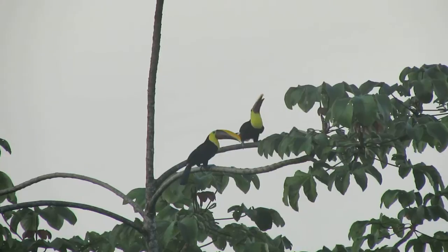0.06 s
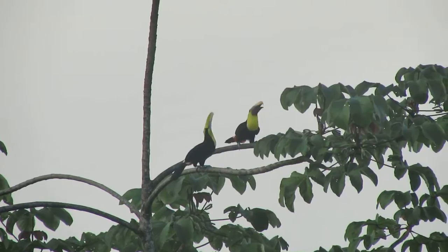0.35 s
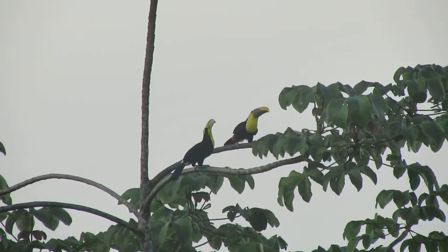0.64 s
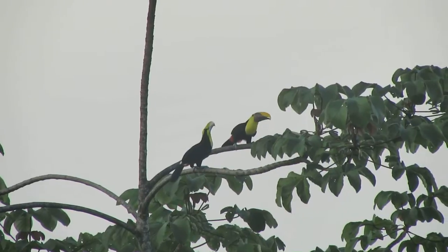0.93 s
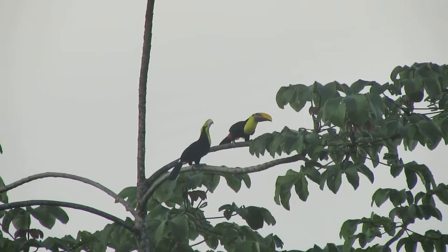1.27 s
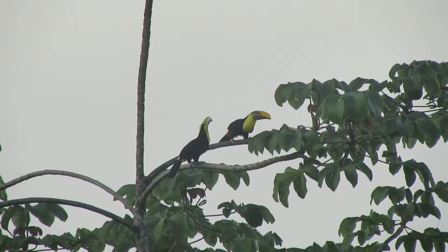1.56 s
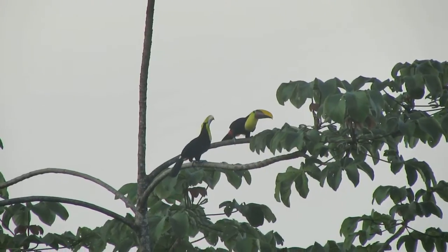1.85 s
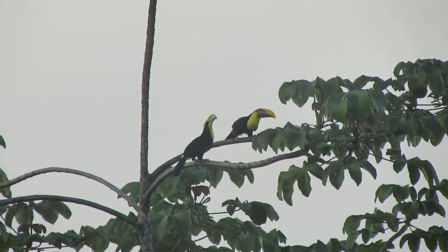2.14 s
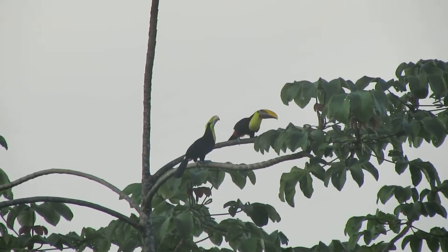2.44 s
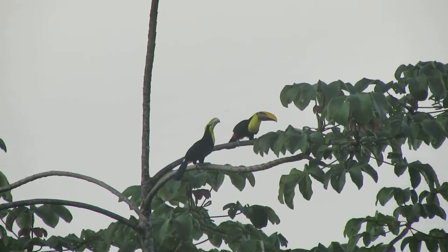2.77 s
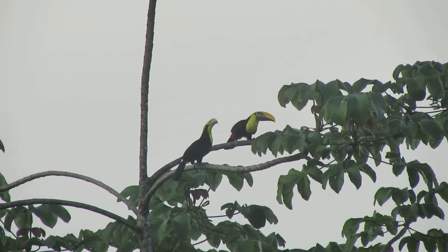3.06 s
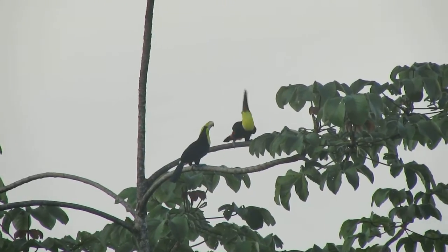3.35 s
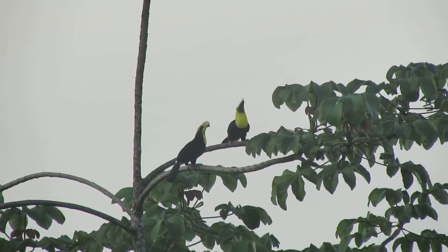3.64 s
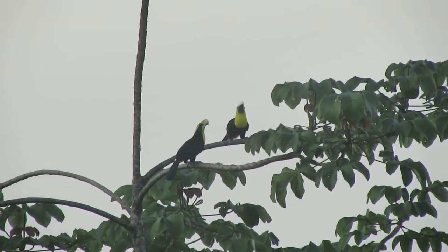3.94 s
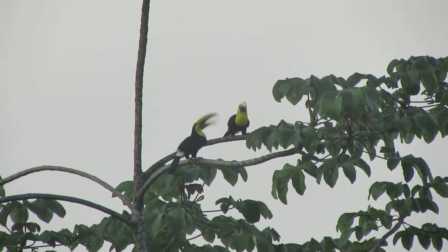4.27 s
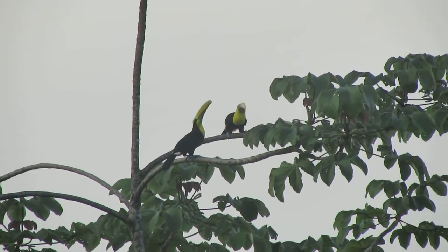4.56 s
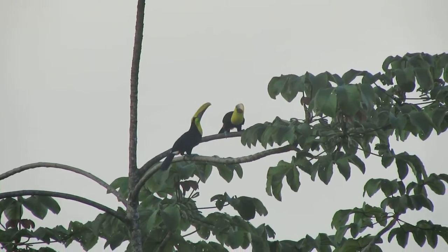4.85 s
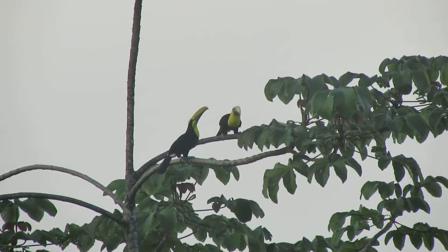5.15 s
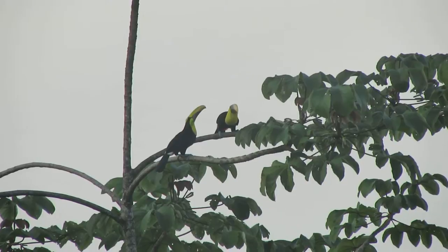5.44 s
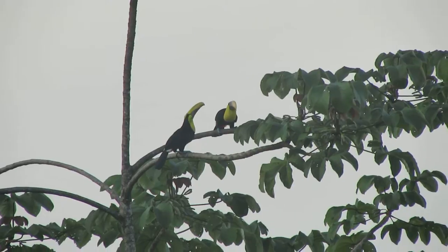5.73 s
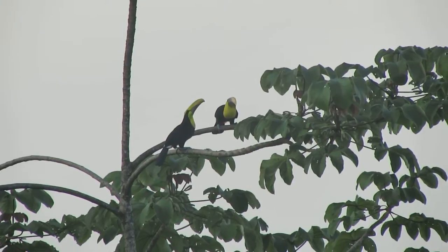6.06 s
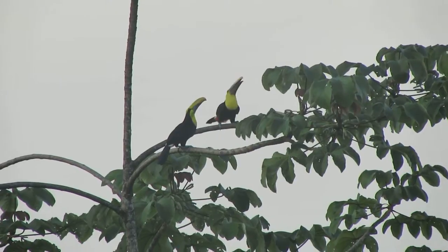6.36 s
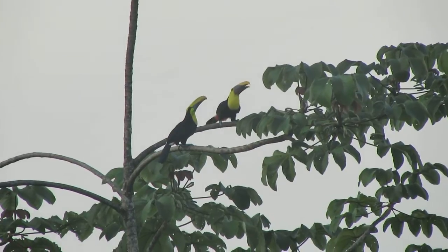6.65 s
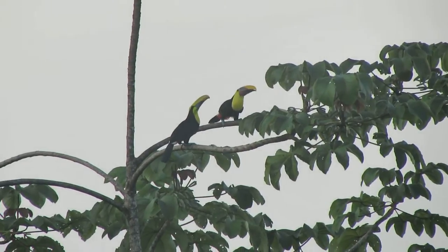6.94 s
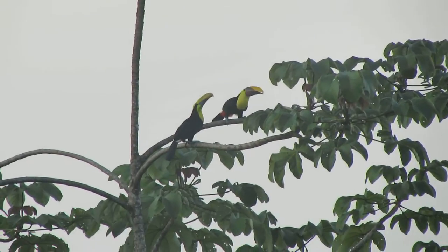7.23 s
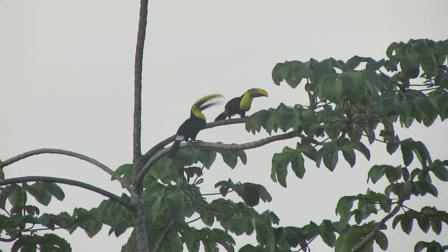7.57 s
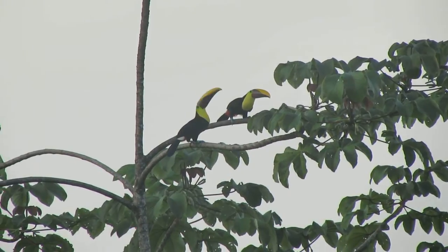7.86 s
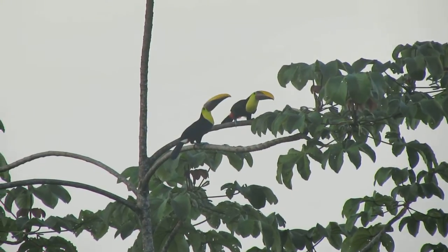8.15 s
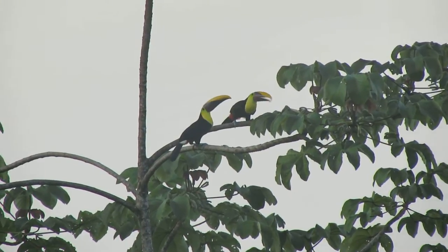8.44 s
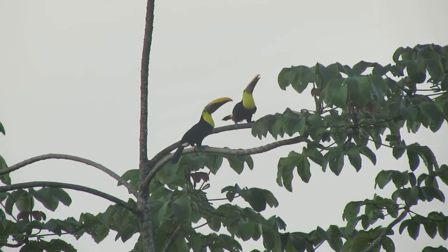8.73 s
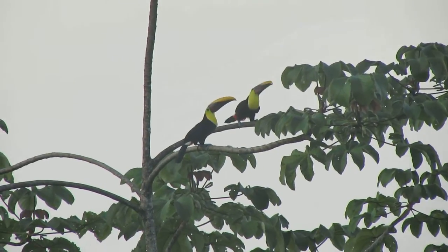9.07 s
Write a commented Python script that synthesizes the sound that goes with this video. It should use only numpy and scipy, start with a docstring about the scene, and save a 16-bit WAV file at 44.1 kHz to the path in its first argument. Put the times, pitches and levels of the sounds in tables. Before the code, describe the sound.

Two toucans yelp and yip loudly in a rainforest treetop, over insect buzz, distant small birds and a low rumble.

```python
"""A low rumble, a distant rush, canopy hiss and narrow bands of insect buzz sound from the start,
and small birds call far off. Almost at once two toucans begin in a treetop: the syrinx gives long
falling yelps, then short arched yips, and the rainforest scatters them into echoes. Scratchy squeaks,
coloured by the beak's resonance, fall among the calls. Fresh phrases open near 3.5 s and 6.3 s;
leaves brush twice around the latter, and the pair calls once more near the end."""
import sys
import numpy as np
from scipy import signal
from scipy.fft import rfft, irfft, next_fast_len
from scipy.io import wavfile
from scipy.ndimage import map_coordinates

SR = 44100
rng = np.random.default_rng(int(sys.argv[2]) if len(sys.argv) > 2 else 0)


def generate_wav(signal):
    """Clip the signal to [-1, 1] and save it as 16-bit WAV at the path in sys.argv[1]."""
    frames = np.transpose(np.atleast_2d(signal))
    scaled = np.clip(frames, -1, 1) * 32767
    pcm = np.round(scaled).astype(np.int16)
    wavfile.write(sys.argv[1], SR, pcm)


N = 410130

RELAXED_HZ, STRAINED_HZ = 1450, 1730  # a toucan's pitch with a slack and a tight membrane
FRAY = 0.028  # random pitch scatter as the pressure drops, as a share of the pitch


def amp(db):
    """Decibels to amplitude ratio."""
    return 10 ** (np.asarray(db) / 20)


def unit(x):
    """Normalisation to rms 1."""
    return x / np.sqrt(np.mean(x ** 2) + 1e-20)


def along(points, hz):
    """Interpolation of (frequency, value) points on a logarithmic frequency axis."""
    freqs, values = np.transpose(points)
    return np.interp(np.log(hz + 1), np.log(freqs + 1), values)


def wobble(rate, size=N):
    """Smooth random modulation: a spline through rate knots a second."""
    knots = rng.standard_normal(size // 20 + 8)
    return map_coordinates(knots, [np.arange(size) * rate / SR], mode="wrap")


def filtered(x, response):
    """Linear filtering: the spectrum is multiplied by a frequency response."""
    size = next_fast_len(N + SR // 2)
    return irfft(rfft(x, size) * response(np.fft.rfftfreq(size, 1 / SR)), size)[..., :N]


def noise(response, correlation):
    """Coloured stereo noise of rms 1; the mid-side ratio sets the left-right correlation."""
    mid, side = filtered(rng.standard_normal((2, N)), response)
    angle = np.arccos(np.clip(correlation, -1, 1)) / 2
    return unit(np.cos(angle) * mid + np.sin(angle) * np.array([side, -side]))


def panned(pan_db):
    """Constant-power panning; pan_db is the left level minus the right."""
    return unit(amp([[pan_db / 2], [-pan_db / 2]]))


def add(track, start, sound):
    """Superposition of a sound on a track at a start time in seconds."""
    i = max(round(start * SR), 0)
    track[..., i:i + sound.shape[-1]] += sound[..., :max(N - i, 0)]


def rumble(base_db=-49, lumps_db=4.5):
    """Low noise, nearly in antiphase between the channels, modulated into lumps and swells."""
    # rumble spectrum: frequency_hz, density_db
    spectrum = [(12, -20.5), (28, -1), (55, -0.5), (85, -20), (140, -41), (400, -62)]
    # Gaussian rises in level: peak_s, half_width_s, rise_db
    swells = [(.1, 0.27, 12.5), (3.35, 0.44, 9), (6.4, 0.51, 5.5), (8.9, .35, 8.5)]
    t = np.arange(N) / SR
    swell_db = sum(rise_db * np.exp(-((t - peak) / width) ** 2) for peak, width, rise_db in swells)
    low = noise(lambda hz: amp(along(spectrum, hz)), correlation=-0.9)
    lumpy = unit(low * amp(lumps_db * wobble(9)))
    return amp(base_db + swell_db) * panned(3.2) * lumpy


def distant_rush(level_db=-47, drift_db=1.5):
    """A diffuse field: noise almost uncorrelated between the channels, drifting in level."""
    # rush spectrum: frequency_hz, density_db
    spectrum = [(41, -19), (70, -5), (113, -3), (204, -2), (256, -2), (292, -3.5), (425, -9.5),
                (527, -14.5), (757, -13.5), (1530, -22), (2020, -25), (2200, -34), (2860, -44),
                (4840, -120)]
    rush = noise(lambda hz: amp(along(spectrum, hz)), correlation=0.011)
    return amp(level_db + drift_db * wobble(6.2)) * panned(-1.2) * rush


def canopy_hiss(level_db=-57.0):
    """Stationary broadband noise: the fine hiss of the canopy."""
    # hiss spectrum: frequency_hz, density_db
    spectrum = [(1200, -4.5), (2000, 2.5), (2550, 3.5), (3500, 0), (5400, -3), (5900, 3), (7000, 0),
                (9500, -9), (10500, -10), (13000, -12.5), (15500, -15.5)]
    return amp(level_db) * noise(lambda hz: amp(along(spectrum, hz)), correlation=0.035)


def insects(throb=0.14, order=5, waver_db=0.8):
    """Amplitude modulation: each kind pulses its own narrow noise band at a slightly unsteady rate."""
    # the buzz of each kind: centre_hz, width_hz, pulse_hz, level_db
    kinds = {"drone": (6498, 619, 54.5, -57.5), "buzz": (7470.5, 561, 104, -68),
             "whine": (8536, 480, 211.5, -66.5), "sizzle": (8623, 897, 211, -68)}
    # when each kind sings: start_s, end_s
    bouts = {"drone": [(-1, 10)], "buzz": [(-1, 2.05), (2.7, 5.5), (6.35, 7.45), (8.05, 10)],
             "whine": [(-1, 2.8)], "sizzle": [(3.35, 10)]}
    fade_s = 0.2
    out, t = np.zeros((2, N)), np.arange(N) / SR
    for kind, (centre_hz, width_hz, pulse_hz, db) in kinds.items():
        band = noise(lambda hz: 1 / (1 + np.abs(2 * (hz - centre_hz) / width_hz) ** order), 0.046)
        rate_hz = pulse_hz * (1 + 0.083 * wobble(22))
        pulses = 1 + throb * np.sin(2 * np.pi * np.cumsum(rate_hz) / SR)
        singing = sum(np.clip(.5 + np.minimum(t - start, end - t) / fade_s, 0, 1)
                      for start, end in bouts[kind])
        out += amp(db + waver_db * wobble(2.3)) * singing * unit(band * pulses)
    return out


def songbirds():
    """Whistles, hoots and chips as gliding pure tones; random frequency modulation makes some rasp."""
    # small birds' calls: start_s, length_s, first_hz, last_hz, relative_db, rasp_share
    calls = [ (0, 0.021, 1330, 1283, -46.5, 0.0028), (0, 0.95, 711, 713, -63.5, 0.0041),
             (0.845, 0.17, 5400, 4530, -45.5, 0.016), (0.955, 0.17, 4720, 3400, -54, 0.035),
             (1.55, 0.5, 2540, 2472, -73, 0.024), (1.739, 0.027, 9800, 5460, -55, .02),
             (2.633, 0.01, 10000, 5320, -47, 0.017), (5.332, 0.071, 1980, 1874, -57, .004),
             (6.07, 0.043, 2450, 2530, -62.5, .01), (7.148, 0.092, 4120, 3850, -46, 0.076)]
    out = np.zeros(N)
    for start, length, first_hz, last_hz, db, rasp in calls:
        u = np.linspace(0, 1, int(length * SR))
        glide_hz = first_hz + (last_hz - first_hz) * u
        pitch = glide_hz * (1 + rasp * wobble(603, size=2 * SR)[:len(u)])
        tone = np.sin(2 * np.pi * np.cumsum(pitch) / SR)
        add(out, start, amp(db) * unit(np.sqrt(u * (1 - u)) * tone))
    return np.array([out, out])


def forest(x, near_db, far_db, near_t60=0.17, build_s=0.024):
    """Scattering: near trunks and leaves echo at once; deeper forest builds and dies, treble first."""
    # reflection by foliage: frequency_hz, gain_db
    reflection = [(1400, -6), (3000, 0), (5000, -2.5), (9000, -6.5)]
    # reverberation time of the deeper forest: frequency_hz, t60_s
    decay_times = [(1400, 1.11), (3000, 0.97), (5000, 1), (10000, 0.061)]
    hz, t, spectra = signal.stft(rng.standard_normal((2, 2, SR)), SR, nperseg=256)
    near, far = spectra * amp(along(reflection, hz))[:, None]
    near_decay = amp(-60 * t / near_t60) * (t > .002)
    far_decay = amp(-60 * t / along(decay_times, hz)[:, None]) * (1 - np.exp(-t / build_s))
    near = signal.istft(near * near_decay, SR, nperseg=256)[1]
    far = signal.istft(far * far_decay, SR, nperseg=256)[1]
    echoes = (amp(near_db) * unit(near) + amp(far_db) * unit(far)) / np.sqrt(far.shape[-1])
    return signal.fftconvolve(x.mean(axis=0)[None], echoes, axes=1)[:, :N]


def syrinx(pitch, bright_db, fundamental_db, jitter=0.0034, shimmer_db=0.66, flutter_db=3.0):
    """A vibrating membrane gives a harmonic series; more tension makes it higher and brighter."""
    # the toucan's harmonics, from the first up: relaxed_db, strained_db, pan_db
    harmonics = [(-8, -14, 1), (-1, 0.5, -4.5), (-16, -11, 6.5), (-28, -14, -2), (-26, -23, 3),
                 (-39, -32.5, 3.5), (-53, -38, -4), (-58, -44, 4), (-69, -65, -9)]
    attack_s, release_s = 0.004, 0.0021
    throat_hz = 1422  # the throat radiates little below this
    t = np.arange(len(pitch)) / SR
    waver = lambda rate: wobble(rate, size=SR // 2)[:len(t)]
    phase = 2 * np.pi * np.cumsum(pitch * (1 + jitter * waver(456))) / SR
    strain = np.clip((pitch - RELAXED_HZ) / (STRAINED_HZ - RELAXED_HZ), 0, 1)
    throat_db = -10 * np.log10(1 + (throat_hz / pitch) ** 28)
    note = np.zeros((2, len(t)))
    for k, (relaxed_db, strained_db, pan_db) in enumerate(harmonics, 1):
        source_db = relaxed_db + (strained_db - relaxed_db) * strain
        if k == 1:
            colour_db = fundamental_db + throat_db
        else:
            colour_db = bright_db * np.log2(k / 2) + flutter_db * waver(77.0)
        note += panned(pan_db) * amp(source_db + colour_db) * np.sin(k * phase)
    gate = np.clip(t / attack_s, 0, 1) * np.clip((t[-1] - t) / release_s, 0, 1)
    return note * gate * amp(shimmer_db * waver(240))


def yelp(length, crest_hz, end_hz, opening_db, slurred, fade_db=-1.0, collapse_db=-10):
    """Pitch glides from crest to sagging shelf, then, unless slurred, collapses with the pressure."""
    glide_s, scoop_s, let_go_s = 0.0096, 0.007, 0.00786
    scoop, droop = 0.02, 0.201  # shares of the pitch lost at onset and in the collapse
    t = np.arange(int(length * SR)) / SR
    fall_s = 0.044 * (crest_hz / STRAINED_HZ) ** 3.84  # higher notes are held longer
    shelf_hz = 0.847 * crest_hz
    high = 1 / (1 + np.exp((t - fall_s) / glide_s))
    sag = np.clip((t - fall_s) / (length - fall_s), 0, 1) ** 2
    collapse = 0 if slurred else np.exp((t - length) / let_go_s)
    fray = FRAY * np.sqrt(collapse) * wobble(683, size=SR // 2)[:len(t)]
    pitch = high * crest_hz + (1 - high) * (shelf_hz + (end_hz - shelf_hz) * sag)
    pitch *= 1 - scoop * np.exp(-t / scoop_s) - droop * collapse + fray
    return pitch, amp(opening_db * high + fade_db * sag + collapse_db * collapse)


def yip(length, crest_hz, arch=0.131, hook=0.118, foot_db=-9, push_db=3):
    """One pressure pulse: pitch rides an arch that frays at its feet; level peaks after the crest."""
    entry = -0.78 * min(length / 0.065, 1) ** 2  # yips under 65 ms start nearer the crest, at u = 0
    u = np.linspace(entry, 1, int(length * SR))
    slack = arch * u ** 2 + hook * np.abs(u) ** 5
    fray = FRAY * u ** 2 * wobble(681, size=SR // 2)[:len(u)]
    return crest_hz * (1 - slack + fray), amp(foot_db * slack / (arch + hook) + push_db * u)


def toucans(yelp_fundamental_db=7.5, yip_fundamental_db=3.5, slur_s=0.025):
    """Phonation: pitch and level contours drive each syrinx; yelps have the fuller fundamental."""
    # long falling notes: start_s, length_s, crest_hz, end_hz, level_db, bird
    yelps = [ (0.052, 0.16, 1732, 1353, -25, "lead"), (0.356, 0.074, 1726, 1330, -31.5, "lead"),
             (3.515, .21, 1755, 1440, -24.5, "lead"), (4.072, 0.14, 1651, 1300, -34, "mate"),
             (4.5, .12, 1720, 1320, -29.5, "lead"), (6.326, 0.18, 1749, 1421, -23.5, "lead"),
             (6.555, .137, 1605, 1366, -32, "mate"), (7.808, 0.048, 1610, 1300, -29, "lead"),
             (8.569, .13, 1627, 1368, -33.5, "mate"), (8.71, .17, 1728, 1446, -24.5, "lead")]
    # short arched notes: start_s, length_s, crest_hz, level_db, tilt_db_per_octave, bird
    yips = [ (0.284, 0.045, 1603, -27, -2, "lead"), (0.326, 0.024, 1408, -30.5, 4.5, "mate"),
            (0.454, 0.012, 1668, -32, -5, "mate"), (.575, .038, 1591, -31.5, 4, "lead"),
            (0.703, 0.03, 1538, -29.5, 2, "lead"), (1.115, 0.018, 1479, -32.5, -1, "lead"),
            (1.225, 0.02, 1454, -34.5, -1, "lead"), (2.337, 0.042, 1490, -40.5, 7.5, "mate"),
            (3.718, 0.073, 1625, -25, 3, "lead"), (4.156, 0.041, 1580, -31, 3, "lead"),
            (4.295, .021, 1506, -26.5, -0.5, "lead"), (4.377, 0.011, 1692, -33.5, -15, "lead"),
            (4.687, 0.047, 1567, -30, -3.5, "lead"), (4.815, 0.029, 1531, -30, -3.5, "lead"),
            (4.966, 0.017, 1360, -39, 4, "mate"), (6.539, .066, 1623, -24.5, -3.5, "lead"),
            (6.785, .018, 1452, -30, 0, "mate"), (6.861, 0.032, 1575, -29, 0.5, "lead"),
            (6.986, 0.0246, 1549, -30.5, 1.5, "lead"), (7.078, 0.0204, 1376, -46, -1, "mate"),
            (7.166, 0.016, 1400, -33.5, 1, "mate"), (7.395, 0.011, 1458, -32.5, 2, "lead"),
            (7.51, 0.0095, 1468, -31.5, 2, "lead"), (8.8, 0.019, 1423, -33, -2, "mate"),
            (8.94, 0.041, 1573, -26, -3.5, "lead"), (9.074, 0.023, 1464, -34.5, 1, "mate"),
            (9.199, 0.014, 1387, -37, 7, "mate"), (9.247, 0.032, 1564, -28, -1.5, "lead")]
    # the lead and, further right, its mate: pan_db, yelp_tilt_db_per_octave, yelp_opening_db
    birds = {"lead": (-1.6, -7.5, -6), "mate": (-13.5, -2.1, 0)}
    out = np.zeros((2, N))
    for start, length, crest_hz, end_hz, db, bird in yelps:
        pan_db, bright_db, opening_db = birds[bird]
        # a yelp is slurred when a yip begins just before it ends
        slurred = any(0 < start + length - yip_start < slur_s for yip_start, *_ in yips)
        pitch, swell = yelp(length, crest_hz, end_hz, opening_db, slurred)
        note = syrinx(pitch, bright_db, yelp_fundamental_db)
        add(out, start, amp(db) * panned(pan_db) * swell * note)
    for start, length, crest_hz, db, bright_db, bird in yips:
        pitch, swell = yip(length, crest_hz)
        note = syrinx(pitch, bright_db, yip_fundamental_db)
        add(out, start, amp(db) * panned(birds[bird][0]) * swell * note)
    return out


def squeaks(depth=0.38, lean=.75, jitter=0.0093, snap_db=9, pan_db=-4, harmonics=5):
    """Source and filter: pitch snaps up and falls, sweeping harmonics through the beak's resonance."""
    # scratchy notes: start_s, length_s, crest_hz, level_db
    notes = [(0.783, 0.043, 1648, -39.5), (2.79, 0.037, 1657, -39), (3.501, 0.051, 1852, -35.5),
             (5.471, 0.033, 1600, -37.5), (7.473, .04, 1668, -39.5), (9.026, 0.036, 1712, -34.5)]
    # response of the beak: frequency_hz, gain_db
    beak = [(1200, -11.5), (1650, -9.5), (2300, -3.5), (2800, -6), (3250, 3), (4000, -4), (4900, -10.5),
            (6000, -20), (9000, -39)]
    out = np.zeros((2, N))
    for start, length, crest_hz, db in notes:
        u = np.linspace(0, 1, int(length * SR))
        arch = np.abs(np.sin(np.pi * u ** lean))
        scratch = 1 + jitter * wobble(900, size=SR // 2)[:len(u)]
        pitch = crest_hz * (1 - depth * (1 - arch)) * scratch
        phase = 2 * np.pi * np.cumsum(pitch) / SR
        edge_db = snap_db * (.5 - 2 * u)  # the upper harmonics are strong only on the way up
        note = sum(amp(along(beak, k * pitch) + edge_db * (k > 2)) * np.sin(k * phase)
                   for k in range(1, harmonics + 1))
        add(out, start, amp(db) * panned(pan_db) * np.sqrt(arch) * note)
    return out


def rustles(grain_db=3):
    """Friction noise of brushing leaves; fast random modulation makes each swish grainy."""
    # swishes: start_s, length_s, level_db
    swishes = [(6.175, 0.06, -54.5), (7.12, 0.15, -51)]
    # leaf spectrum: frequency_hz, density_db
    spectrum = [(1500, -14), (4000, -3), (6000, -2.5), (10000, -18), (15500, -20)]
    swell = np.zeros(N)
    for start, length, db in swishes:
        add(swell, start, amp(db) * np.hanning(int(length * SR)))
    friction = noise(lambda hz: amp(along(spectrum, hz)), correlation=.4)
    return swell * unit(friction * amp(grain_db * wobble(340)))


def scene():
    """Direct-to-reverberant ratio sets distance: toucans in the open, small birds mostly as echoes."""
    pair, distant = toucans() + squeaks(), songbirds()
    near_calls = pair + panned(-3.3) * forest(pair, near_db=-5.5, far_db=-12.5)
    far_calls = amp(-9.5) * distant + forest(distant, near_db=1.0, far_db=-10.5)
    return near_calls + far_calls + rustles() + insects() + rumble() + distant_rush() + canopy_hiss()


def record(dry):
    """Band limiting: an ideal low-pass filter removes everything above 15.7 kHz."""
    return filtered(dry, lambda hz: hz < 15700)


dry = scene()
out = record(dry)
generate_wav(out)
```